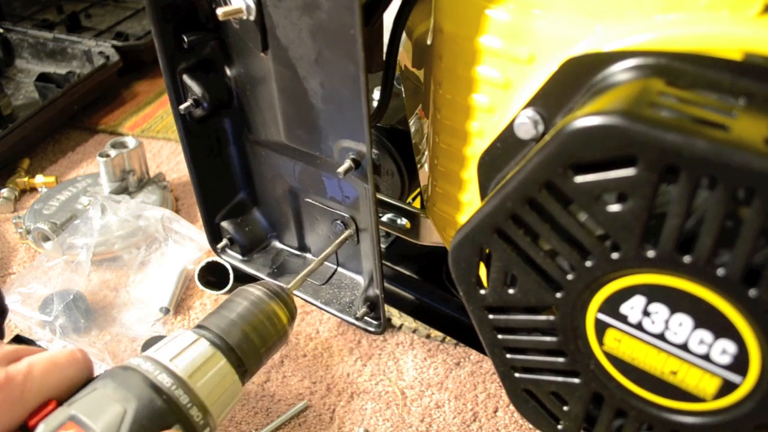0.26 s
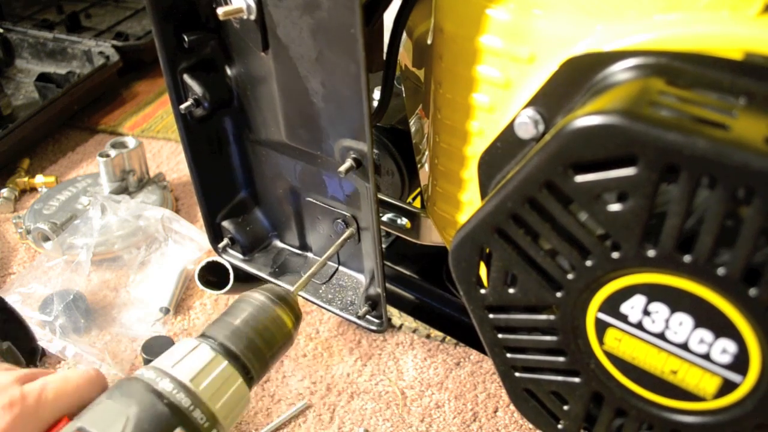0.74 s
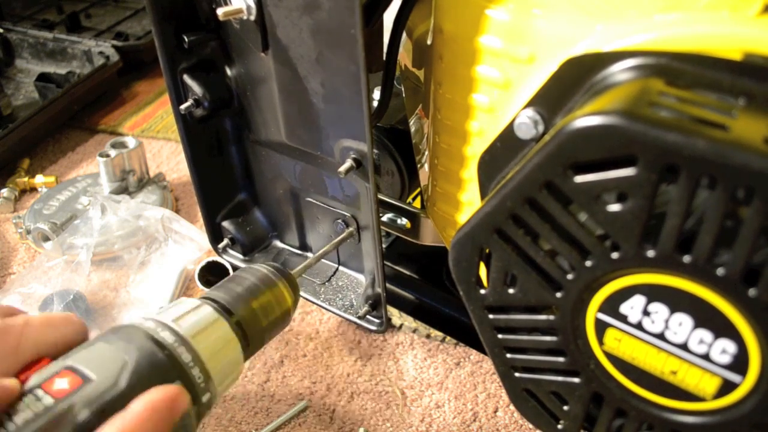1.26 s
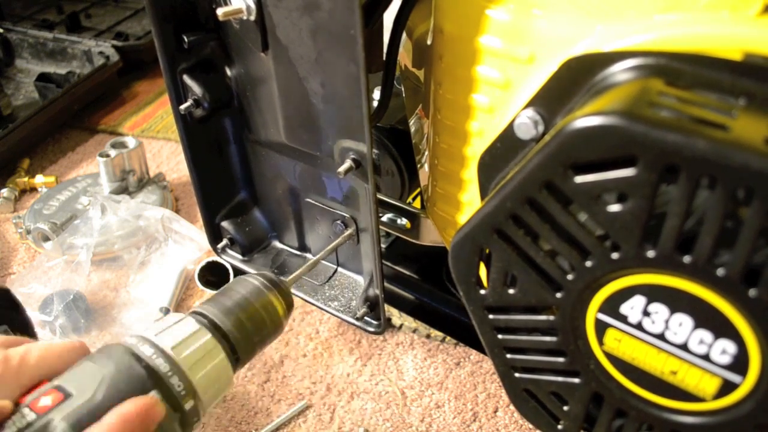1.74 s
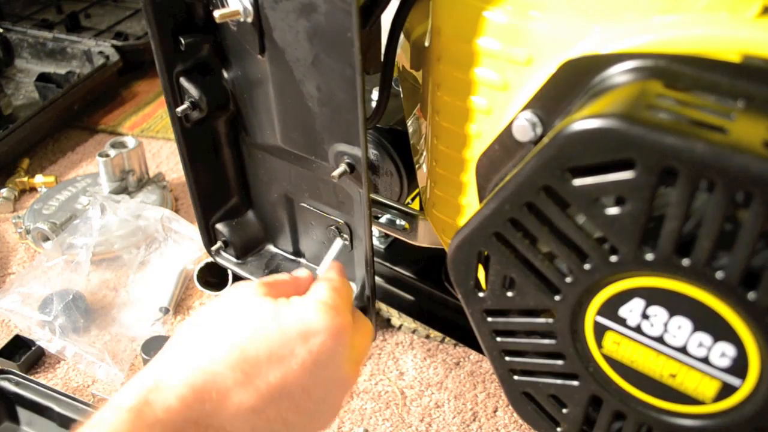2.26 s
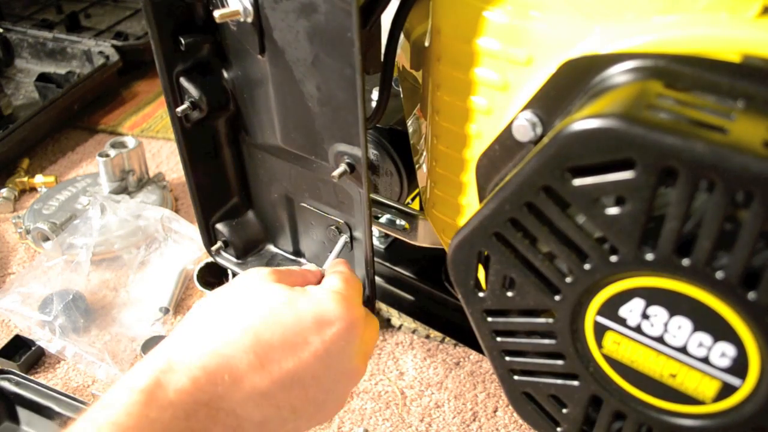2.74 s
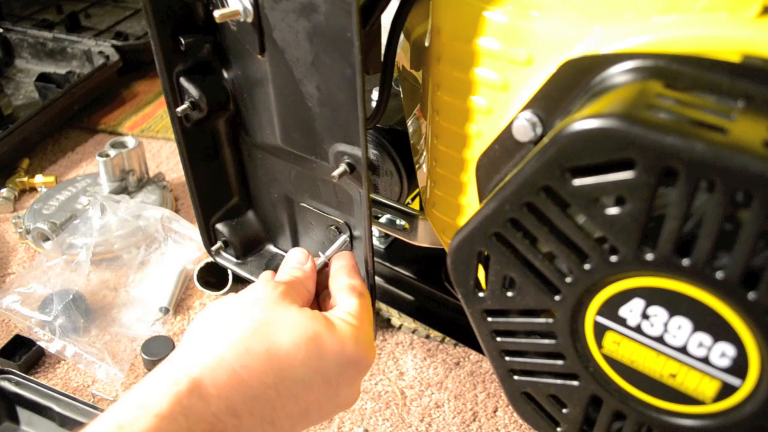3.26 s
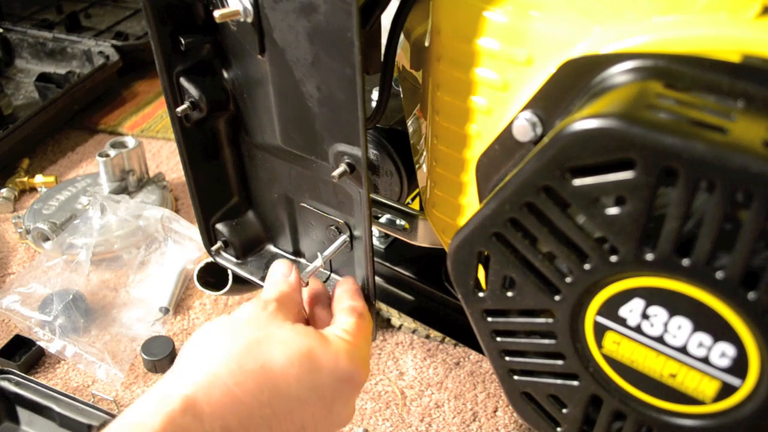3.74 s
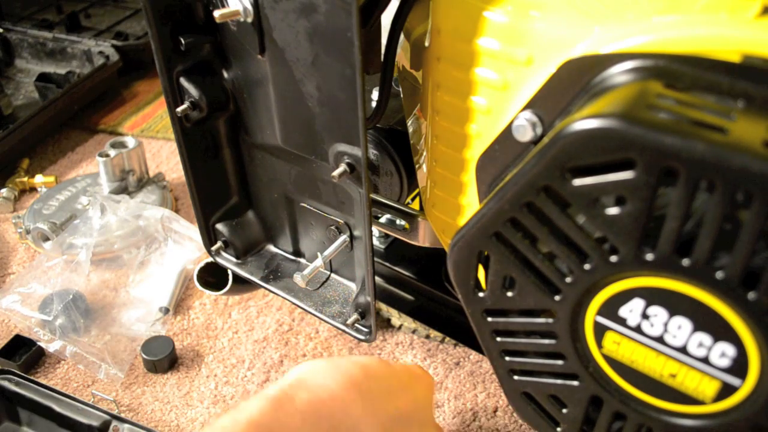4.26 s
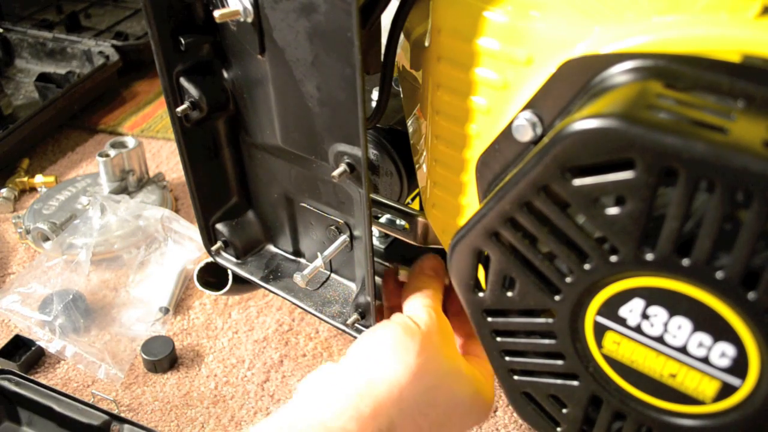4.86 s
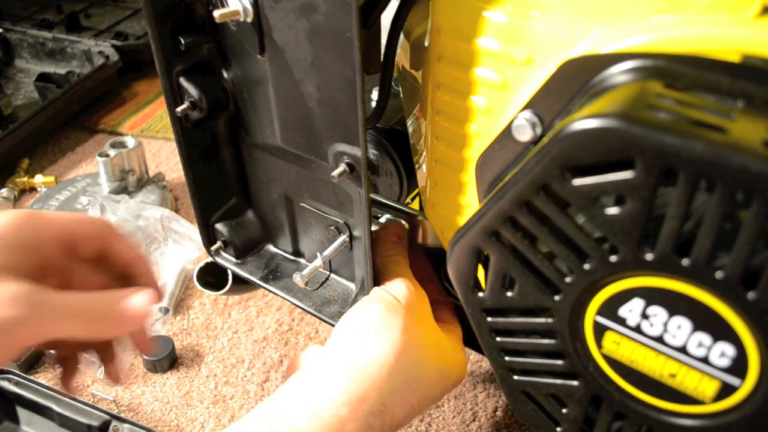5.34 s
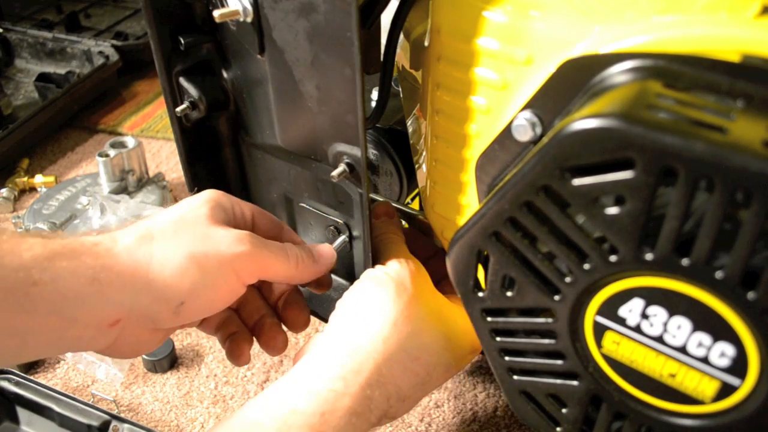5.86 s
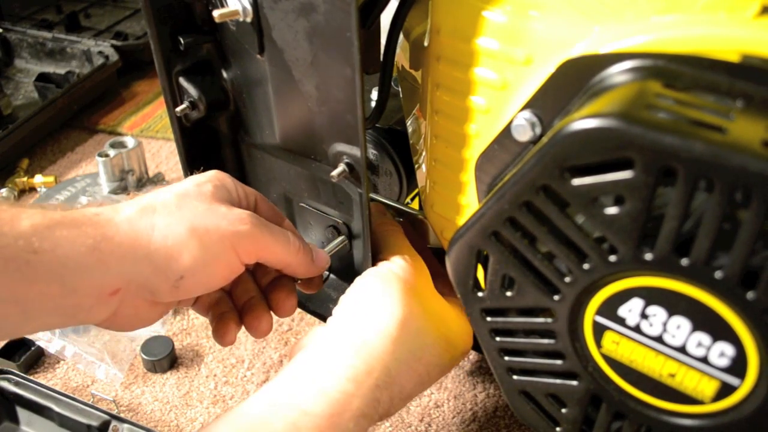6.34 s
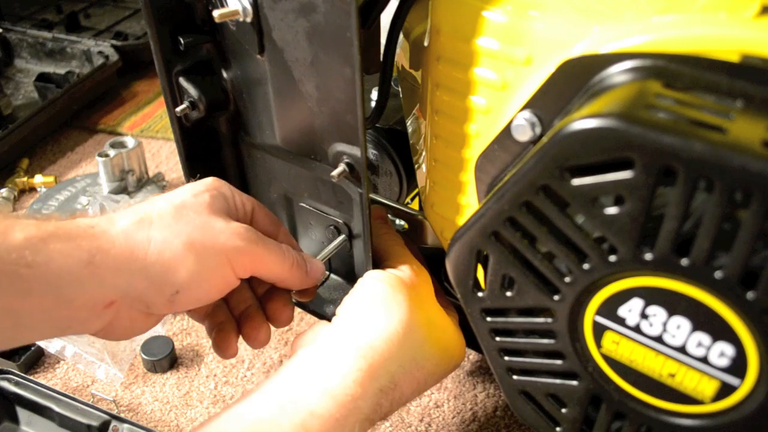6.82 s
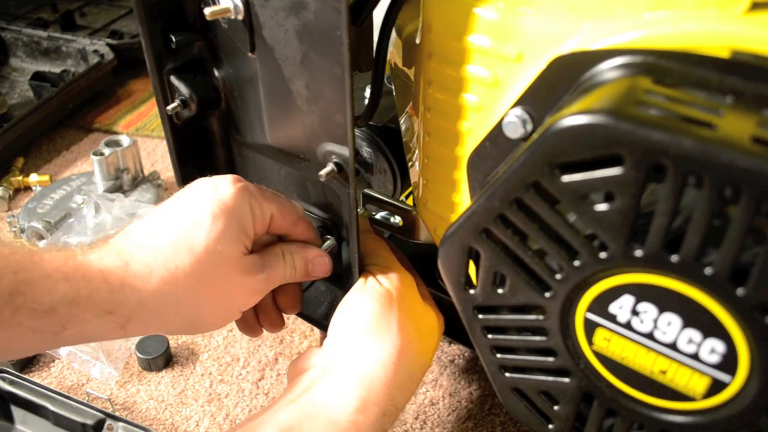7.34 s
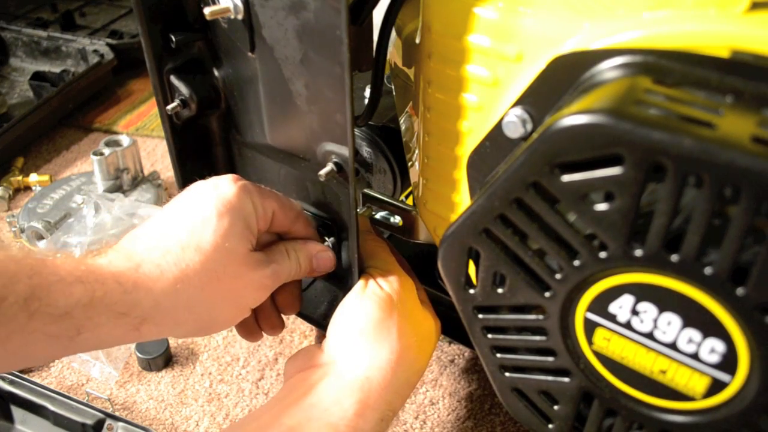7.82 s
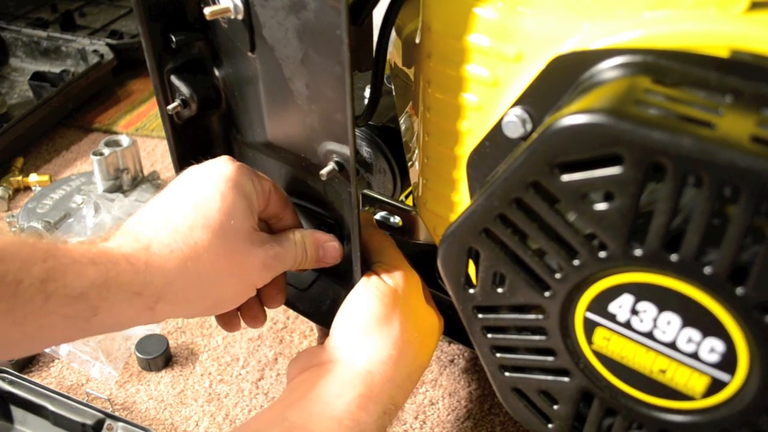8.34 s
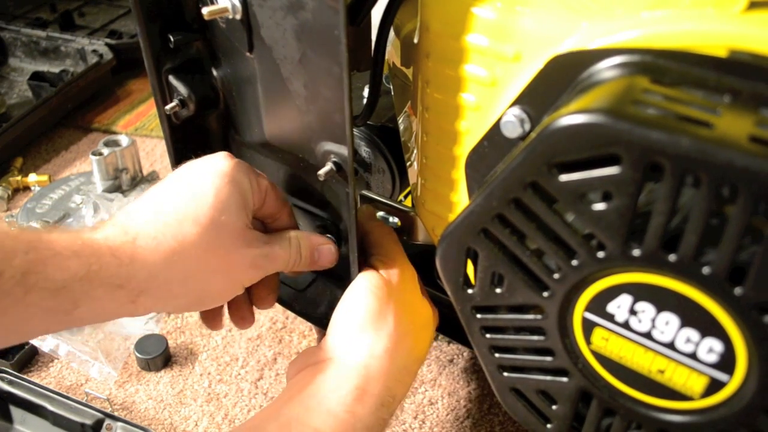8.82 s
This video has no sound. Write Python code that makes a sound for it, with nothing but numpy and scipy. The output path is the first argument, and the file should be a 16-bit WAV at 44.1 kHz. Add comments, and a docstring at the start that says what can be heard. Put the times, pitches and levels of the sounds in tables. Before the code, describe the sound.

A cordless drill whines and hisses through sheet steel, squeals and stops abruptly; a screw rattles in the hole, then a ratchet clacks hard.

```python
"""A small humming workshop: a cordless drill whines and hisses through sheet steel, squeals, stops abruptly.
Then a long screw knocks and scrapes in the hole, hands brush over carpet, a socket clinks and a ratchet clacks.
The drill is speed-following sines plus banded noise; blows are noise cracks plus decaying modes;
scrapes and brushes are gated, coloured noise; the background is noise and hum lines."""
import sys
import numpy as np
from scipy import signal
from scipy.fft import rfft, irfft
from scipy.io import wavfile

SR = 44100
rng = np.random.default_rng(int(sys.argv[2]) if len(sys.argv) > 2 else 0)


def store_wav(level_fs):
    """Save 16-bit WAV to argv[1]."""
    pcm = np.round(np.clip(np.atleast_2d(level_fs), -1, 1) * 32767)
    wavfile.write(sys.argv[1], SR, pcm.T.astype(np.int16))


N = 400428
TIME = np.arange(N) / SR

# steel panel modes, some in close beating pairs: mode_hz, relative_db, t60_s
PANEL = [(925, -12, .2), (1066, -6, .26), (1270, -11, .2), (1386, -12, .2), (1632, -3, .4), (1677, -3, .35),
         (1857, -13, .3), (2307, -5, .18), (2440, 0, .27), (2508, 0, .27), (2640, -1, .27),
         (2961, -11, .25), (3208, -6, .25), (3271, -6, .25), (3430, -8, .33), (3860, -8, .14),
         (4215, -11, .2), (4310, -10, .22), (4415, -10, .27), (4720, -12, .18), (5060, -10, .17),
         (6487, -22, .18), (6918, -22, .18), (8877, -26, .18)]
# spectrum of screw on steel: freq_hz, relative_db_per_hz
SCREW_COLOUR = [(59, -62), (100, -44), (729, -23), (1060, -10), (1340, -13), (1670, -11), (2070, -12.5),
                (2470, -8), (2830, -11), (3250, -11), (4030, -21.5), (4820, -18), (6600, -26.5),
                (9400, -25), (11000, -41), (14300, -67), (22000, -120)]


def amp(db):
    """Decibels to gain."""
    return 10 ** (np.asarray(db) / 20)


def evened(x):
    """Scales to an rms of 1."""
    return x / np.sqrt(np.mean(x ** 2) + 1e-20)


def read(points, hz):
    """Interpolates a table on a log-frequency axis."""
    f, value = np.transpose(points)
    return np.interp(np.log(hz + 1), np.log(f + 1), value)


def add(mix, start_s, sound):
    """Mixes a sound in at start_s."""
    part = mix[round(start_s * SR):][:len(sound)]
    part += sound[:len(part)]


def noise(colour, size=N, peaks=(), band_hz=(0, SR)):
    """Unit-rms noise with a spectrum, resonances (hz, width_hz, db) and band limits."""
    hz = np.fft.rfftfreq(size, 1 / SR)
    db = read(colour, hz)
    for f, width, height in peaks:
        db = db + height / (1 + (2 * (hz - f) / width) ** 2)
    inside = (hz >= band_hz[0]) * (hz < band_hz[1])
    return evened(irfft(rfft(rng.standard_normal(size)) * amp(db) * inside, size))


def wander(knots_per_s):
    """Random drift of unit rms, linear between random knots."""
    knots = rng.standard_normal(N // 8)
    return evened(np.interp(TIME * knots_per_s, np.arange(len(knots)), knots))


def low_pass(x, hz, size):
    """FIR low-pass, the steeper the longer it is."""
    return signal.oaconvolve(x, signal.firwin(size, hz, window=("kaiser", 9), fs=SR), "same")


def strokes(rows, attack_s, release_s):
    """Gain over time: each stroke swells, holds and lets go."""
    gain = np.zeros(N)
    for start, length, db in rows:
        ramp = np.minimum((TIME - start) / attack_s, (start + length - TIME) / release_s)
        gain += amp(db) * np.clip(ramp, 0, 1)
    return gain


def strike(brightness_db, bands_db, colour, modes, crack_t60_s, ring_db, crack_db, detune):
    """One steel-on-steel blow: a crack of dense, quickly damped modes, then the few that ring on."""
    rise_s, scatter_db, ring_tilt_per_octave = .0012, 3, 0.29
    # a bright blow trades bass for presence and treble
    bass, presence, treble = np.add(bands_db, brightness_db * np.array((-0.46, 0.8, 1.33)))
    t = np.arange(int(SR / 2)) / SR
    short = t[:4096]
    out = np.zeros(len(t))
    # strong modes colour the crack too
    body = [(hz, 110, 7 * amp(mode_db / 2)) for hz, mode_db, _ in modes]
    # band_hz, band_db, multiple of crack_t60_s: higher bands die sooner
    bands = [((0, 1400), bass, 1.55), ((1400, 3400), 0, 1.38),
             ((3400, 6000), presence, 0.8), ((6000, SR), treble, .75)]
    for band_hz, band_db, slowness in bands:
        crack = noise(colour, size=len(short), peaks=body, band_hz=band_hz)
        crack *= amp(-60 * short / (crack_t60_s * slowness)) * np.minimum(short / rise_s, 1)
        crack /= np.sqrt(np.sum(crack ** 2) / (0.0086 * SR))  # energy of 8.6 ms at unit rms
        add(out, 0, amp(crack_db + band_db) * crack)
    # each blow lands on another spot under another grip: modes shift and share energy differently
    hz, mode_db, t60 = np.transpose(modes)[:, :, None]
    hz = hz * (1 + detune * rng.standard_normal(hz.shape))
    tilt_db = ring_tilt_per_octave * brightness_db * np.log2(hz)
    share = amp(mode_db + tilt_db + scatter_db * rng.standard_normal(hz.shape))
    share /= np.linalg.norm(share)
    ringing = share * amp(-60 * t / t60) * np.sin(2 * np.pi * (hz * t + rng.random(hz.shape)))
    return out + amp(ring_db) * ringing.sum(0) * np.minimum(t / rise_s, 1)


def blows(rows, **how):
    """Plays a table of blows on one object; how holds the strike settings."""
    out = np.zeros(N)
    for start, db, brightness_db in rows:
        add(out, start, amp(db) * strike(brightness_db, **how))
    return out


def background():
    """Room air as coloured noise, with wavering hum lines."""
    # hum lines: freq_hz, relative_db
    hum_lines = [(118.4, -72), (177, -72), (226.1, -78), (296.1, -71.5), (360.7, -69), (511.4, -75.5)]
    # air noise: freq_hz, relative_db_per_hz
    air_colour = [(25, -25), (85, -14), (112, -9), (149, -13.5), (247, -12.5), (362, -7.5), (470, -9),
                  (1800, -13), (3300, -18.5), (6000, -28), (8000, -35), (10500, -38), (12000, -60)]
    hum = np.zeros(N)
    for hz, db in hum_lines:
        hum += amp(db) * (1 + 0.19 * wander(6)) * np.sin(2 * np.pi * hz * TIME + wander(4.2))
    air = noise(air_colour) * amp(.5 * wander(32))
    return amp(-59.3) * air + amp(1.5) * hum


def room(x):
    """Diffuse workshop tail, the treble dying first."""
    # decay: freq_hz, t60_s
    decay = [(200, 0.7), (1500, 0.32), (4000, 0.24), (10000, 0.21)]
    build_up_s = 0.0017
    hz, t, z = signal.stft(rng.standard_normal(SR // 2), SR, nperseg=256)
    tail = signal.istft(z * amp(-60 * t / read(decay, hz)[:, None]), SR, nperseg=256)[1]
    tail *= np.minimum(np.arange(len(tail)) / SR / build_up_s, 1) ** 2
    return signal.fftconvolve(x, tail / np.linalg.norm(tail))[:N]


def brushing():
    """Skin drags unevenly over carpet and paint, faintly sounding the panel."""
    # hand and forearm strokes: start_s, length_s, relative_db
    brush_rows = [(3.83, 0.12, -55.5), (4.03, 0.25, -57.5), (4.73, 0.32, -57.5), (5.0, .22, -55.5),
                  (5.555, 0.11, -43), (5.63, 0.12, -50), (5.76, 0.088, -53), (8.975, 0.038, -42.5)]
    # brush spectrum: freq_hz, relative_db_per_hz
    brush_colour = [(300, -23), (1000, 1.5), (2500, 0), (4000, -0.5), (5500, -1), (7500, -3.5),
                    (10000, -8.5)]
    grain_db, drag_db = 2, -2.5
    rub = noise(brush_colour, peaks=[(hz, 130, 5) for hz, _, _ in PANEL[1::3]])
    rub *= amp(grain_db * wander(830) + drag_db * wander(70))
    return amp(-1.0) * strokes(brush_rows, attack_s=0.028, release_s=0.078) * evened(rub)


def scraping():
    """The thread catches and slips on the rim, exciting the panel's resonances."""
    # thread on the hole's edge, plus fingertip scuffs at 4.96 s: start_s, length_s, relative_db
    scrape_rows = [(2.38, 0.086, -43), (2.57, .11, -49), (2.712, 0.068, -45.5), (2.878, 0.18, -39),
                   (3.34, 0.14, -44.5), (3.59, 0.059, -43.5), (4.96, 0.26, -59), (6.615, .05, -46.5),
                   (6.645, 0.14, -39), (6.76, 0.52, -56.5)]
    grain_db, catch_db = 3, 2
    resonances = [(hz, 80, 6) for hz, _, _ in PANEL]
    rub = noise(SCREW_COLOUR, peaks=resonances + [(6000, 23000, 2)])
    rub *= amp(grain_db * wander(860) + catch_db * wander(110))
    return amp(-3) * strokes(scrape_rows, attack_s=0.012, release_s=0.037) * evened(rub)


# bands_db below: bass, presence, treble against 1.4-3.4 kHz for a blow of zero brightness

def socket():
    """Light, bright clinks as the socket feels for the nut, and two faint handling clicks near 7.1 s."""
    # clinks, the last two handling clicks: start_s, relative_db, brightness_db
    clink_rows = [(5.046, -54, 15), (5.352, -31, 8.5), (5.786, -56, -1), (5.915, -50.5, 7.5),
                  (5.956, -49, -1), (6.002, -32.5, -7.5), (6.064, -34.5, 2), (6.112, -65, 20),
                  (6.225, -56.5, -9), (6.288, -40.5, -4.5), (6.428, -34.5, -3), (6.648, -40.5, -7),
                  (6.655, -35.5, 4), (6.7, -47, -9), (6.718, -42, 6.5), (6.783, -48, 6),
                  (7.077, -48.5, -12), (7.145, -45, -7.5)]
    # socket on screw: mode_hz, relative_db, t60_s
    socket_modes = [(888, 2, 0.076), (1103, -10.5, 0.3), (1293, -4.5, 0.11), (1686, -2, 0.16),
                    (1900, -4, 0.32), (2532, 2, 0.25), (2685, 9.5, 0.11), (3735, -1.5, 0.15),
                    (4420, -15, 0.45), (5090, 8.5, 0.041), (4800, -23, .09), (6130, -19, 0.044),
                    (7290, -2, 0.12), (9240, -4, .06)]
    # crack spectrum: freq_hz, relative_db_per_hz
    socket_colour = [(59, -37), (100, -45), (446, -16.5), (611, -19.5), (905, -8.5), (1390, -17.5),
                     (1570, -8.5), (2150, -2), (2620, -11), (3250, -7.5), (5530, -8.5), (6600, -16),
                     (9220, -13.5), (11000, -25), (14300, -59), (22000, -120)]
    return blows(clink_rows, bands_db=(-6.5, -1.9, -11.5), colour=socket_colour, modes=socket_modes,
                 crack_t60_s=0.042, ring_db=0, crack_db=1.5, detune=0.008)


def ratchet():
    """Hard clacks of pawl and handle ring ratchet and socket, damped by the hand."""
    # clacks: start_s, relative_db, brightness_db
    clack_rows = [(7.685, -23, -2), (7.698, -18, 1), (7.71, -19.5, 1), (7.735, -17, 2), (7.755, -41.5, -8),
                  (7.825, -46.5, 2.5), (7.882, -43.5, -7.5), (7.897, -29.5, 3.5), (7.914, -28, -3.5),
                  (7.944, -23, -1.5), (7.948, -15, 2), (8.157, -20, 4), (8.169, -14.5, 1),
                  (8.185, -14, 4.5), (8.193, -26, 8.5), (8.405, -48, -5.5), (8.885, -50, -9),
                  (9.0, -54.5, 9)]
    # hand-held ratchet and socket: mode_hz, relative_db, t60_s
    ratchet_modes = [(432, -17, .2), (905, -6, .11), (965, -7, .11), (1166, -8, .13), (1385, -7, .16),
                     (1545, -5, .12), (1670, -2, .16), (1776, -5, .13), (1938, -7, .11), (2260, -5, .13),
                     (2430, -4, .14), (2550, -5, .14), (2695, 0, .13), (3080, -1, .13), (3700, -6, .12),
                     (3980, 0, .12), (4180, -5, .11), (4420, -5, .14), (4610, -7, .13), (5090, -8, .1),
                     (5362, -9, .1), (6160, -10, .09), (6910, -12, .08), (7477, -15, .08), (8930, -16, .07)]
    # crack spectrum: freq_hz, relative_db_per_hz
    ratchet_colour = [(24, -65.5), (45, -38.5), (260, -28.5), (420, -19.5), (720, -21.5), (910, -11.5),
                      (1100, -11.5), (1680, -4.5), (3400, -8), (4100, -7), (5560, -14.5), (6110, -10.5),
                      (7920, -21.5), (9110, -17), (11000, -28.5)]
    return blows(clack_rows, bands_db=(-6, -4.5, -11), colour=ratchet_colour, modes=ratchet_modes,
                 crack_t60_s=0.031, ring_db=-6.0, crack_db=-0.5, detune=0.0052)


def screw():
    """The screw is wiggled through the hole and sets the panel ringing."""
    # knocks: start_s, relative_db, brightness_db
    knock_rows = [(2.349, -51.5, -34), (2.473, -44, -1), (2.518, -25.5, 2), (2.531, -22, -10.5),
                  (2.661, -37.5, 1), (2.74, -36, -31), (2.876, -23, -0.5), (2.914, -24.5, -2),
                  (2.93, -24, 1), (2.94, -26.5, 0), (2.986, -28, -5), (3.009, -30.5, -1.5),
                  (3.054, -15.5, 1.5), (3.072, -21, 5.5), (3.083, -15, 0.5), (3.099, -21, 7.5),
                  (3.282, -49.5, -7), (3.321, -49, -4), (3.351, -38.5, -7), (3.392, -34.5, -13),
                  (3.414, -39, 12), (3.433, -28, -3.5), (3.476, -36, -21), (3.521, -38, 5.5),
                  (3.625, -33.5, 2), (3.65, -35, 3), (3.702, -36, 5.5), (3.862, -52, -35),
                  (3.887, -53, -10)]
    return blows(knock_rows, bands_db=(-13, -8, -21), colour=SCREW_COLOUR, modes=PANEL,
                 crack_t60_s=0.055, ring_db=-8, crack_db=0.0, detune=0.0011)


def drill():
    """Motor and gear lines follow the shaft speed; the cutting edges tear off chips in a gritty hiss."""
    # motor whine, sagging as the bit bites: time_s, whine_hz
    whine_track = [(0.0, 2429), (0.19, 2427), (0.21, 2461), (0.3, 2432), (0.88, 2381), (0.91, 2398),
                   (1.16, 2325), (1.24, 2366), (1.32, 2366), (1.41, 2310), (1.53, 2330), (1.64, 2263),
                   (1.67, 2303), (1.76, 2290), (1.81, 2223), (1.85, 2277), (1.91, 2263), (1.93, 2301),
                   (2.02, 2314), (2.06, 2268), (2.11, 2437), (2.17, 2436)]
    # motor and gear partials: multiple_of_whine, relative_db, unsteadiness (0-1)
    gear_partials = [(1, 1, .12), (1.71, -9, .4), (2, -7, .3), (2.94, -5, .4), (3.06, -5, .4), (4, 2, .4),
                     (5, 8.5, .35), (6, -1, .4), (6.21, 7, .35)]
    # cutting noise: freq_hz, relative_db_per_hz
    cut_colour = [(35, -81), (60, -48), (536, -42.5), (937, -39.5), (1010, -43), (2070, -31), (2380, -26),
                  (2670, -23.5), (3450, -20.5), (5900, -15.5), (6950, -8.5), (8980, -4.5), (13000, -10.5),
                  (14600, -5), (15700, -10.5)]
    # bit and chuck resonances: freq_hz, width_hz, boost_db
    bit_peaks = [(966, 33, 13), (1860, 30, 8.5), (3424, 40, 13), (4070, 180, 5.5), (5250, 56, 9.5),
                 (7140, 98, 7), (9650, 1700, 2.5), (12700, 500, 0), (14400, 1200, 1)]
    breakthrough_s, end_s, stop_t60_s = 2.06, 2.207, .035

    speed_hz = np.interp(TIME, *np.transpose(whine_track))
    turns = np.cumsum(speed_hz * (1 + .0005 * wander(60))) / SR  # whine cycles
    # load weakens the whine and makes the top partials sing louder
    load = np.clip((speed_hz.max() - speed_hz) / np.ptp(speed_hz), 0, 1)
    through = np.clip((TIME - breakthrough_s) / .04, 0, 1)
    # cutting noise and gear song drop once the bit is through
    whine = amp(-58 - 7 * load)
    sing = amp(-61 + 4.2 * load - 5 * through)
    cut = amp(-38 - .3 * load - 2 * through)
    chatter = amp(-54.5 + 3.2 * load - 4.5 * through)

    lines = np.zeros(N)
    for k, db, loose in gear_partials:
        mesh = evened(1 + loose * (wander(8) + .7 * wander(50)))
        mesh *= sing if k >= 5 else whine
        phase = 2 * np.pi * k * turns + loose * wander(70)
        lines += amp(db) * mesh * np.sqrt(2) * np.sin(phase)

    rotor = np.cos(2 * np.pi * turns / 8)
    grit = evened(amp(0.5 * wander(1000)) * (1 + 0.093 * rotor))
    hiss = cut * noise(cut_colour, peaks=bit_peaks, band_hz=(5900, SR))
    rasp = chatter * noise(cut_colour, peaks=bit_peaks, band_hz=(2700, 5900))
    body = amp(-67) * noise(cut_colour, peaks=[*bit_peaks, (2386, 810, 0.5)], band_hz=(0, 2700))
    # the free bit squeals in the hole
    squeal = noise([(11000, -36), (13000, 21), (13600, -1), (15000, -6), (16000, -29)])
    squeal *= amp(-45) * through * evened(amp(9.5 * wander(60)))
    running = amp(-60 * np.maximum(TIME - end_s, 0) / stop_t60_s)
    return running * (lines + grit * (hiss + rasp) + body + squeal)


def scene():
    """The drill, then the work on the screw."""
    knocks, clinks, clacks = screw(), socket(), ratchet()
    echo = room(amp(-11) * knocks + amp(-11) * clinks + amp(-9) * clacks)
    shop = knocks + clinks + clacks + echo + scraping() + brushing() + background()
    shop = np.clip(shop, -.85, .85)  # hard-clips the loudest peaks
    # workshop sounds, hum and air included, fade in after the drill and are duller than it
    begun = np.clip((TIME - 2.229) / 0.011, 0, 1)
    return (drill() + begun * low_pass(shop, hz=10900, size=121))[None]


def record(dry):
    """Steep overall band limit."""
    return low_pass(dry[0], hz=15750, size=1023)[None]


dry = scene()
out = record(dry)
store_wav(out)
```